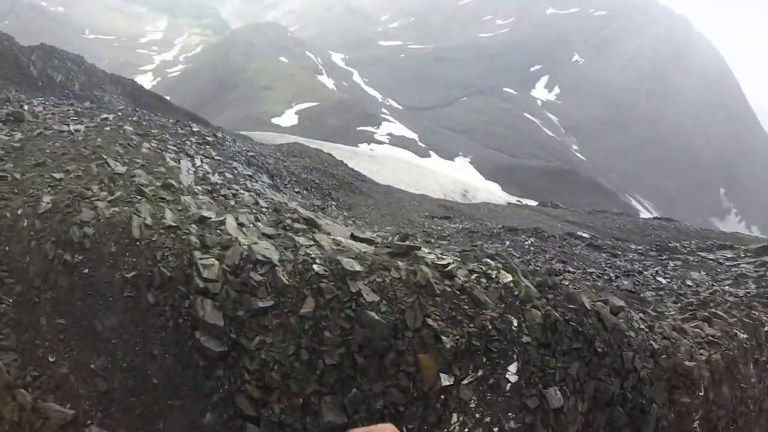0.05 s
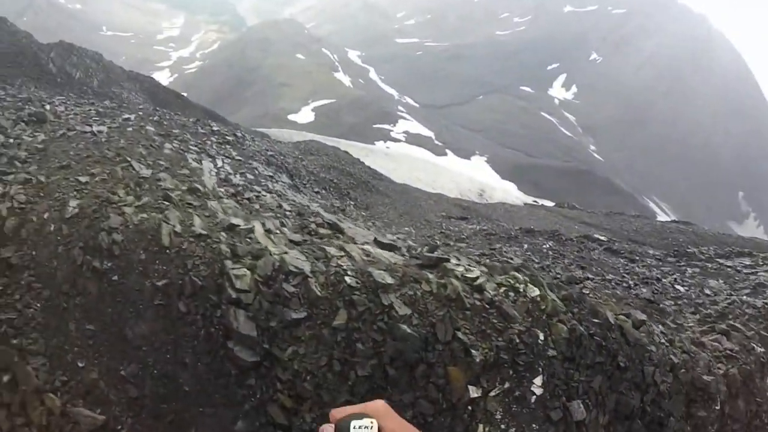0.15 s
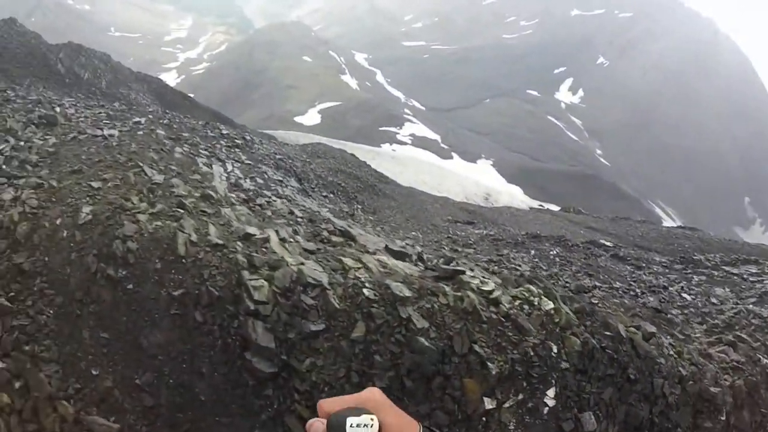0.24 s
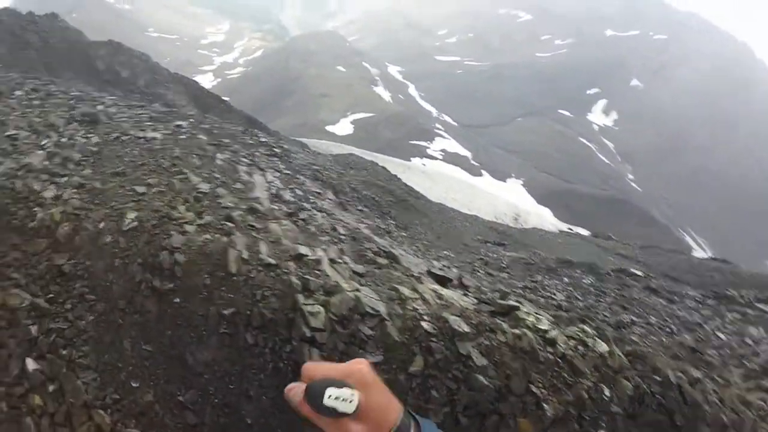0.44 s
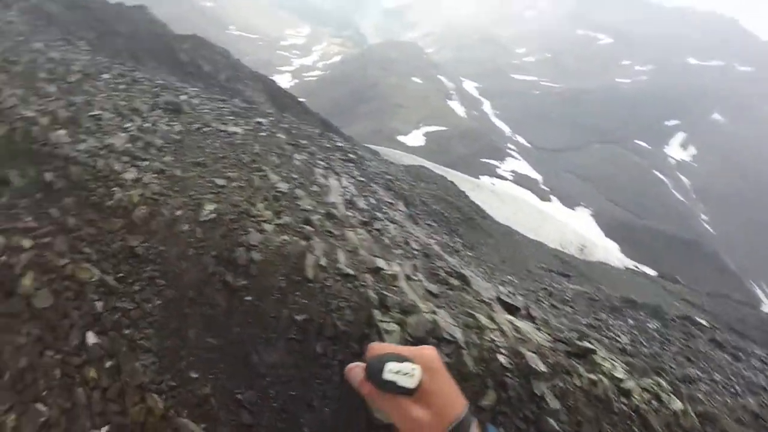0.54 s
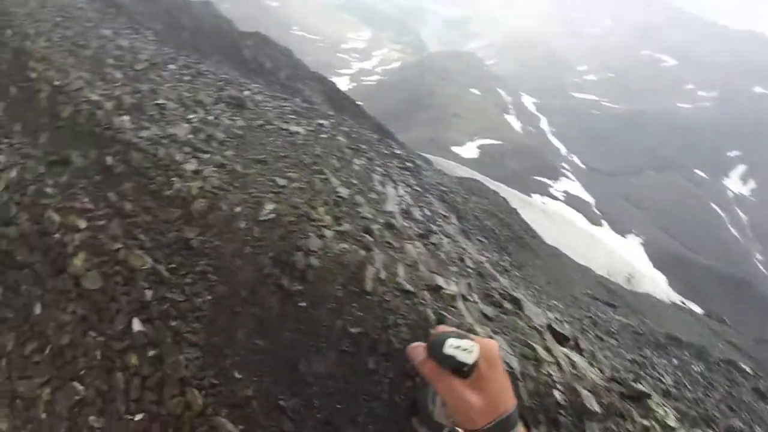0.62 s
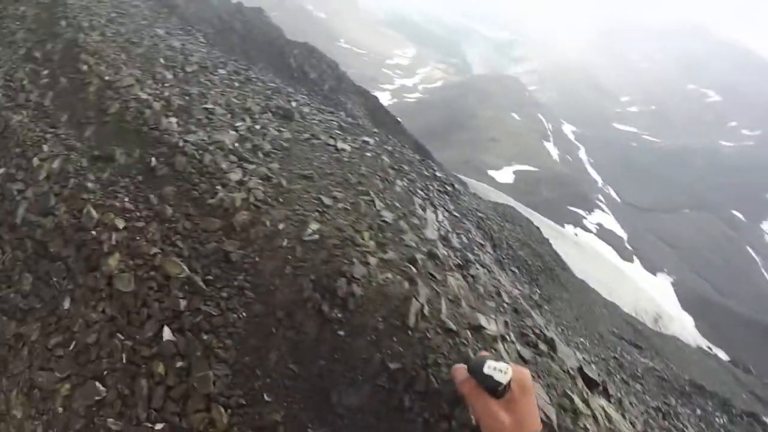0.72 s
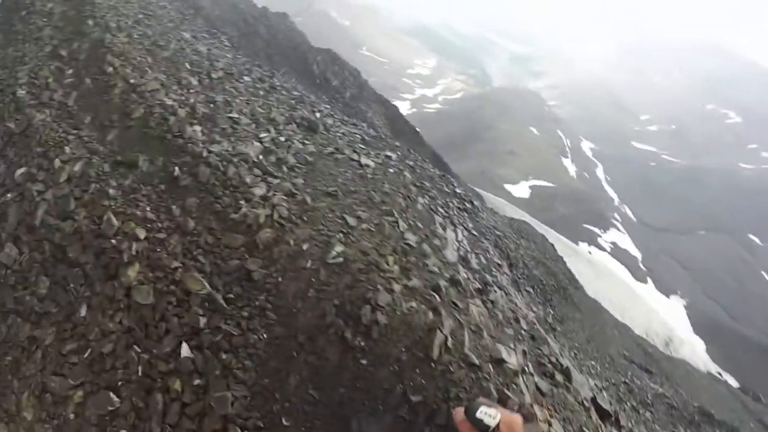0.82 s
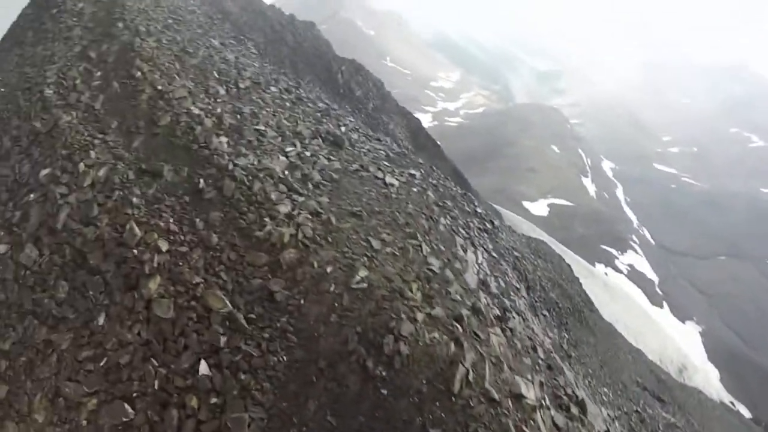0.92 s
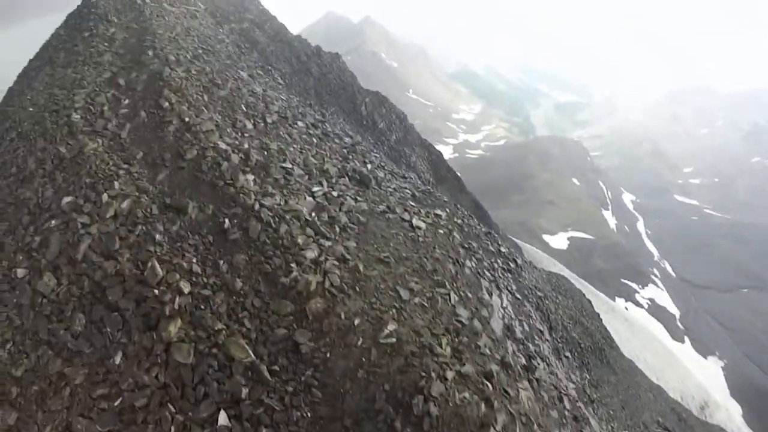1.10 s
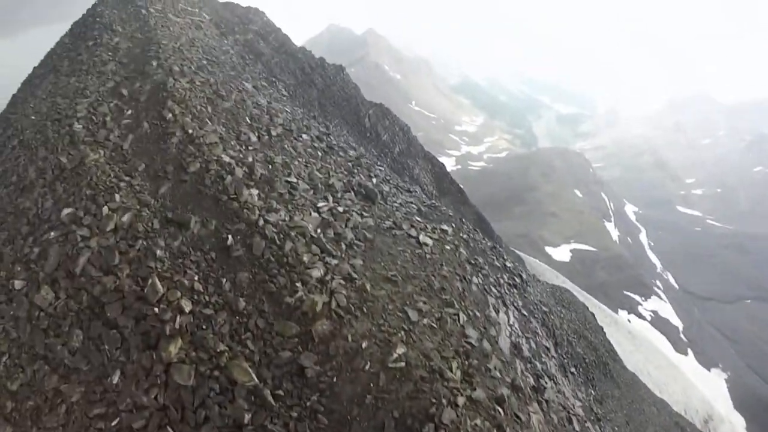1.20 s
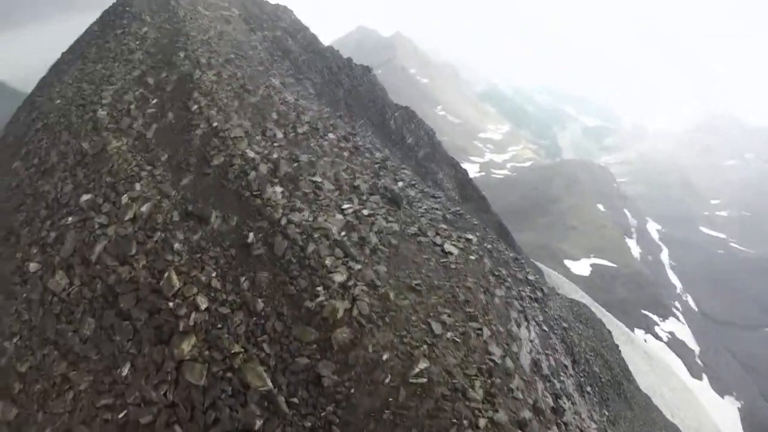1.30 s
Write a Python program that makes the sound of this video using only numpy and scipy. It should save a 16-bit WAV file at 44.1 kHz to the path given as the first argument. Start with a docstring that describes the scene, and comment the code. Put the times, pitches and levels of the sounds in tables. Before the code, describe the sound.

A hiking pole clacks on rock among light knocks of loose stones, with faint wind.

```python
"""Hiking over loose stones

A hiker crosses an open mountain ridge. The pole tip strikes rock, hard once and softly later,
and its shaft rings briefly. Flat stones tip and clack against each other and grit crunches,
all with no echo. Faint wind rumbles on the microphone over a steady hiss of air."""
import sys
import numpy as np
from scipy import signal
from scipy.fft import rfft, irfft
from scipy.io import wavfile

SR = 44100
rng = np.random.default_rng(int(sys.argv[2]) if len(sys.argv) > 2 else 0)


def int16_out(signal):
    """Quantize to a 16-bit WAV file."""
    q = np.round(np.clip(np.atleast_2d(signal).T, -1, 1) * 32767)
    wavfile.write(sys.argv[1], SR, q.astype(np.int16))


N = 59535
AGE = np.arange(SR // 4) / SR   # time since a contact [s]

# the tone of the wind's rumble and of the air's hiss: (frequency [Hz], relative level [dB])
RUMBLE_SPECTRUM = [(15, -2), (28, 0), (55, -3), (85, -9.5), (130, -20.5), (250, -39), (600, -86)]
HISS_SPECTRUM = [(60, 0), (160, 2.5), (340, -1), (750, -7), (1400, -8.5), (3000, -13.5), (5500, -21),
                 (12000, -32.5), (15000, -40)]
# the rumble rises and falls: (time [s], level [dB])
GUSTS = [(0, -40), (.08, -42), (.2, -50), (.32, -48.5), (.39, -43), (.52, -49), (.62, -47), (0.778, -39.5),
         (.9, -55), (1.11, -49), (1.21, -51), (1.31, -45)]
# grit gives way: (time [s], starting level [dB], centre pitch [Hz], spread [ratio], fade time [s])
CRUNCHES = [(0.1110, -47, 3540, 1.34, 0.061), (0.138, -54, 3300, 1.26, .03),
            (0.4871, -45, 3600, 1.4, 0.034), (0.7357, -47.5, 5970, 1.6, 0.0097)]
# stones knock together: (time [s], peak level [dB], first tone [Hz], second tone [Hz],
# second tone's relative level [dB], treble cut [Hz], fade time [s])
KNOCKS = [(0.0806, -45, 1080, 1660, -9, 2480, 0.0095), (0.1226, -40.5, 1210, 1730, -7, 4200, .012),
          (0.2801, -41, 1015, 1160, -22, 1490, 0.023), (0.3243, -35.5, 1400, 1750, -9, 1920, 0.013),
          (0.4070, -49.5, 1040, 1400, -16, 1890, 0.015), (0.4222, -44.5, 1440, 1950, -1.5, 2400, 0.019),
          (0.4875, -40.5, 1040, 1650, 1.5, 2600, 0.016), (0.5566, -15, 1780, 2900, -5.5, 12900, 0.0081),
          (0.5669, -42.5, 1960, 2800, -6, 3300, 0.011), (0.5830, -44.5, 1280, 1600, -17, 1900, 0.0087),
          (0.6206, -24, 3040, 3910, -2.5, 3870, 0.0061), (0.6406, -36.5, 1480, 2700, -14, 3280, 0.0033),
          (0.6425, -39.5, 900, 1490, 0, 1910, 0.0071), (0.7628, -37.5, 996, 1626, -1, 3240, 0.014),
          (0.7928, -43.5, 1820, 3200, 12, 3700, 0.0054), (0.8564, -35, 1220, 2250, -1, 2820, 0.011),
          (0.9601, -30.5, 1140, 2520, -3, 2600, 0.01), (0.9630, -38, 800, 1684, -3, 1900, 0.024),
          (0.994, -51, 1950, 2200, -19, 2400, 0.026), (1.218, -33, 1172, 1730, -6, 2400, .021),
          (1.3065, -32, 1324, 2070, -10, 2900, 0.0066)]
# a flat stone's higher tones, relative to its second: (frequency [ratio], level [dB])
STONE_OVERTONES = [(1.25, -4.5), (1.48, -7), (2.0, -8), (2.2, -44), (3.45, -16.5), (3.85, -30)]
# the pole hits rock: (time [s], clack's peak level [dB], pitch from the rock's size [ratio],
# bass cut [Hz], treble cut [Hz], shaft ring level [dB])
POLE_STRIKES = [(0.2059, 2.5, 0.99, 48.3, 12300, -37.5), (1.1062, -21, .87, 850, 2480, -54),
                (1.1154, -30.5, .85, 900, 2700, -53)]
# the tones of the tip's clack and the shaft's ring: (frequency [Hz], relative level [dB], fade time [s])
TIP_TONES = [(1624, -8, 0.018), (1780, 1, 0.011), (2400, 1.5, 0.014), (2646, 5.5, 0.0082), (3050, -1, .009),
             (3710, -14.5, 0.016), (4640, -36, 0.016), (5500, -10, 0.0051), (6150, -12, 0.0073),
             (7240, -18, 0.0081), (10060, -25.5, 0.0053), (10970, -11, 0.0024), (13100, -8, 0.0017),
             (13800, -29, 0.0034)]
SHAFT_TONES = [(1906, -13, .15), (2218, 0, .12), (2864, -14, .12), (4880, -20, .07)]


def from_db(db):
    """Turn decibels into a number to multiply a sound by."""
    return 10 ** (np.asarray(db) / 20)


def fade(fade_s):
    """A vibration dies away, losing 60 dB over its fade time."""
    return from_db(-60 * AGE / fade_s)


def filtered(x, hz, kind, order=2):
    """Keep the "low", "high" or "band" part of a sound; a higher order cuts more sharply."""
    return signal.sosfilt(signal.butter(order, np.clip(hz, 10, .45 * SR), kind, fs=SR, output="sos"), x)


def unit_rms(x):
    """Scale a sound so its average strength (rms) is 1."""
    return x / np.sqrt(np.mean(x ** 2))


def unit_peak(x):
    """Scale a sound so its highest peak is 1."""
    return x / np.abs(x).max()


def add(out, time_s, sound):
    """Mix a sound in at the given time."""
    start = max(int(time_s * SR), 0)
    out[start:start + len(sound)] += sound[:max(N - start, 0)]


def ring(tones):
    """A struck object rings with several pure tones, each fading at its own rate."""
    return sum(from_db(db) * np.sin(2 * np.pi * hz * AGE) * fade(fade_s) for hz, db, fade_s in tones)


def thud(hz):
    """The dull push of a contact: one rounded pulse, shorter when hz is higher."""
    phase = 2 * np.pi * hz * AGE
    return phase * np.exp(1 - phase)


def grit(hz, spread, fade_s, grains_per_s=3900):
    """Tiny grains click at random around one pitch and die away."""
    clicks = rng.standard_normal(len(AGE)) * (rng.random(len(AGE)) < grains_per_s / SR)
    return unit_rms(filtered(clicks, [hz / spread, hz * spread], "band")) * fade(fade_s)


def shaped_noise(spectrum):
    """Steady noise with the given balance of low and high frequencies."""
    hz, db = np.transpose(spectrum)
    all_hz = np.maximum(np.fft.rfftfreq(N, 1 / SR), 1)
    gain = from_db(np.interp(np.log(all_hz), np.log(hz), db))
    return unit_rms(irfft(rfft(rng.standard_normal(N)) * gain, N))


def wind(hiss_db=-56.5):
    """Gusts rumble on the microphone over an even hiss of air."""
    gust_db = np.interp(np.arange(N) / SR, *np.transpose(GUSTS))
    rumble = from_db(gust_db) * shaped_noise(RUMBLE_SPECTRUM)
    hiss = from_db(hiss_db) * shaped_noise(HISS_SPECTRUM)
    return rumble + hiss


def crunches():
    """Fine grit gives way in short, bright bursts."""
    out = np.zeros(N)
    for time_s, db, hz, spread, fade_s in CRUNCHES:
        add(out, time_s, from_db(db) * grit(hz, spread, fade_s))
    return out


def stones(hard_knock_db=-13):
    """Flat stones knock and ring; harder knocks have more thud and more snap from the edges."""
    out = np.zeros(N)
    for time_s, db, first_hz, second_hz, second_db, treble_cut_hz, fade_s in KNOCKS:
        overtones = [(second_hz * ratio, second_db + level, fade_s / np.sqrt(ratio))
                     for ratio, level in STONE_OVERTONES]
        stone_ring = ring([(first_hz, 0, fade_s), (second_hz, second_db, fade_s)] + overtones)
        click = AGE == 0
        chatter = from_db(-27) * rng.standard_normal(len(AGE)) * fade(0.007)
        # the first click and each tiny contact after it set the stone ringing
        knock = signal.fftconvolve(click + chatter, stone_ring)[:len(AGE)]
        knock = filtered(knock, 0.95 * first_hz, "high")   # a stone gives off little below its first tone
        knock = unit_peak(filtered(knock, treble_cut_hz, "low", order=4))
        force_db = db - hard_knock_db
        push = from_db(-14 + force_db) * thud(hz=800)
        snap = from_db(-25 + 0.41 * force_db) * grit(hz=10700, spread=1.05, fade_s=0.0046)
        add(out, time_s, from_db(db) * (knock - push + snap))
    return out


def pole():
    """The tip clacks on rock, rings the shaft and shakes grit; a glancing touch loses thud and treble."""
    out = np.zeros(N)
    for time_s, db, pitch, bass_cut_hz, treble_cut_hz, shaft_db in POLE_STRIKES:
        tip_ring = ring([(hz * pitch, level, fade_s) for hz, level, fade_s in TIP_TONES])
        push = from_db(-0.5) * thud(hz=1020)
        rattle = from_db(-26) * grit(hz=2200, spread=1.1, fade_s=0.059)
        hit = filtered(tip_ring + push + rattle, 900, "high", order=1)   # small things give little bass
        hit = filtered(hit, bass_cut_hz, "high", order=4)
        tick = from_db(-17) * filtered(hit, treble_cut_hz, "high")   # heard even in a soft touch
        clack = filtered(hit, treble_cut_hz, "low", order=6) + tick
        shaft_ring = from_db(shaft_db) * ring(SHAFT_TONES)
        add(out, time_s, from_db(db) * unit_peak(clack) + shaft_ring)
    return out


def scene():
    """Everything is close by in the open air, mixed into one channel."""
    return (pole() + stones() + crunches() + wind())[None]


def record(dry):
    """A slight overload rounds off the hardest peak, and the highest treble is cut away."""
    ceiling, cutoff_hz = 0.99, 15200
    rounded = ceiling * np.tanh(dry / ceiling)
    return signal.sosfilt(signal.ellip(10, .1, 80, cutoff_hz, fs=SR, output="sos"), rounded)


dry = scene()
out = record(dry)
int16_out(out)
```